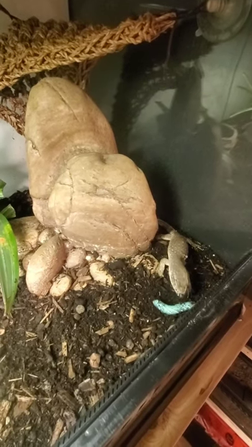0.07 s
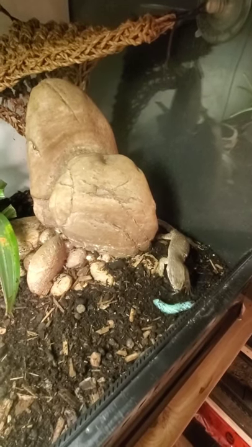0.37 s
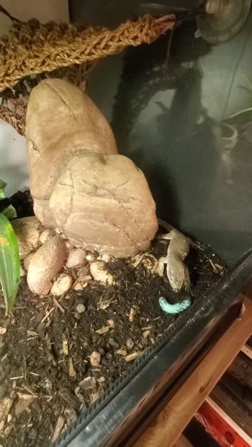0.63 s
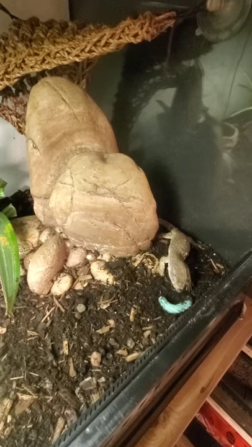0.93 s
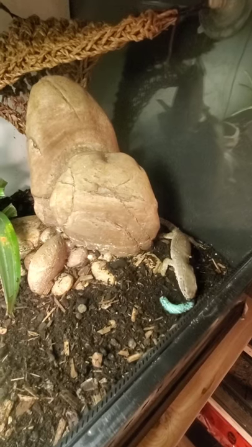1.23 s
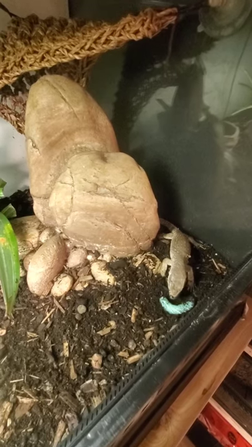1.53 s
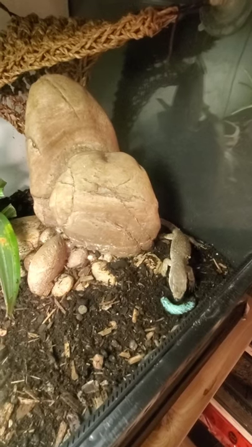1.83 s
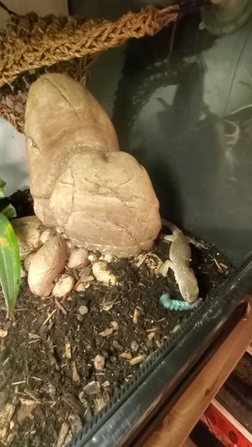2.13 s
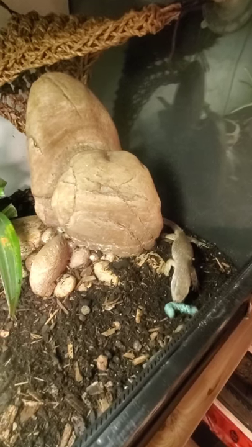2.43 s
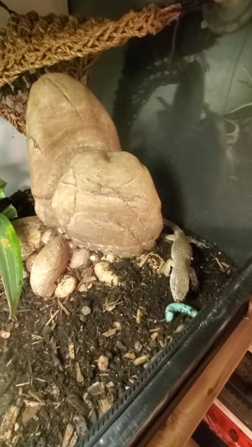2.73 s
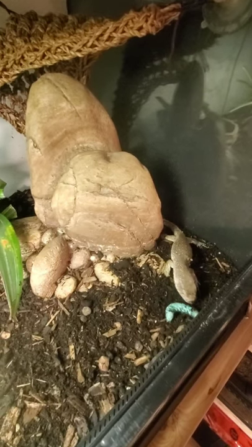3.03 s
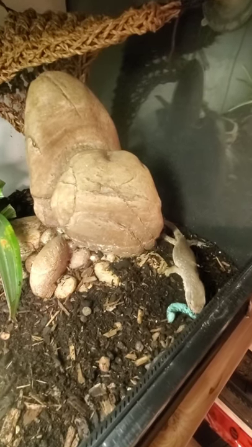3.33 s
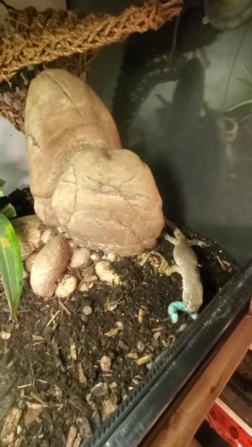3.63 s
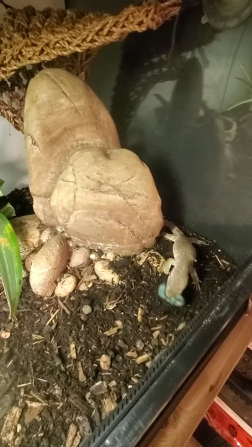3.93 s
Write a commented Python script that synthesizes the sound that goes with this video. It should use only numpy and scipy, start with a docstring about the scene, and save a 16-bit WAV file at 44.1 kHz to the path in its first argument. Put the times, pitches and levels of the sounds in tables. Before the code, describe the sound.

A low ventilation hum runs steadily in a quiet room, with a terrarium lamp hissing faintly on the left. Small ticks come from the right, a dull scuff follows midway, then a few soft handling bumps near the microphone.

```python
"""A quiet room with a lit terrarium. Ventilation noise excites the room's resonances, with a wavering
drone and a deep rumble. The mains hum at even harmonics, and a lamp on the left sizzles and whines,
its amplitude modulated at the mains frequency. Over this come a few soft handling bumps, one dull
scuff just after two faint rings, and on the right some small ticks and one faint falling squeak."""
import sys
import numpy as np
from scipy import signal
from scipy.fft import rfft, irfft
from scipy.io import wavfile
from scipy.ndimage import uniform_filter1d

SR = 44100
rng = np.random.default_rng(int(sys.argv[2]) if len(sys.argv) > 2 else 0)


def master(y):
    """Save y as 16-bit WAV."""
    cut = np.clip(np.atleast_2d(y).T, -1, 1)
    pcm = np.round(cut * 32767)  # scale
    wavfile.write(sys.argv[1], SR, pcm.astype(np.int16))


N = 176400
TIME, HZ = np.arange(N) / SR, np.maximum(np.arange(N // 2 + 1) * SR / N, 1)
MAINS_HZ = 59.985
BASS_PAN_DB = 1.3  # every pan is the left level minus the right

# Ventilation noise. Each row: frequency in Hz, relative spectral density in dB.
AIR_SPECTRUM = [(40, -4.5), (90, 3), (125, 4.5), (160, -2.5), (220, -7), (290, -7.5), (380, -5), (470, -12),
                (560, -20), (750, -23.5), (1200, -27), (1450, -24.5), (1900, -29.5), (2300, -27),
                (3000, -33)]
# Room resonances. Each row: frequency in Hz, bandwidth in Hz, level in dB, pan in dB.
ROOM_MODES = [(68.2, 7.7, -58, -1.5), (100, 6.5, -64, 0.5), (109.9, 12, -61.5, 1), (603, 13, -90, -2),
              (885, 6.8, -102, -2), (1068, 24, -95.5, 13)]
# Envelope of the drone. Each row: time in seconds, level in dB.
DRONE_LEVEL = [(0, -66), (.45, -71.5), (.7, -61), (1.1, -75), (1.5, -63), (2.0, -69.5), (2.5, -71),
               (3.0, -70.5), (4, -68)]
# Envelope of the rumble. Each row: time in seconds, relative level in dB.
RUMBLE_LEVEL = [(0.0, -69), (0.03, -42), (0.11, -48.5), (0.14, -59), (0.19, -45), (0.36, -45),
                (0.49, -56.5), (0.71, -42.5), (0.91, -50), (0.97, -41), (1.0, -59), (1.16, -38),
                (1.27, -69.5), (1.34, -45), (1.68, -46.5), (1.71, -52), (1.83, -41.5), (2.03, -56.5),
                (2.09, -41.5), (2.16, -70), (2.25, -37), (2.52, -44), (2.57, -38.5), (2.68, -75),
                (2.74, -38.5), (2.8, -40.5), (2.84, -51), (3.07, -41), (3.11, -53.5), (3.2, -44),
                (3.5, -52.5), (3.83, -47.5), (3.85, -44), (4.0, -47)]
# Mains hum. Each row: harmonic number, level in dB, pan in dB.
HUM_HARMONICS = [(2, -55.5, 2.5), (4, -75, -10)]
# Lamp sizzle. Each row: frequency in Hz, relative spectral density in dB.
SIZZLE_SPECTRUM = [(2000, -32.5), (3200, -7), (5000, -10.5), (5800, -6.5), (6700, -9.5), (7150, -23),
                   (7600, -27), (8200, -10.5), (9300, -3.5), (11500, 1.5), (14000, 7), (15600, -2.5)]
# Direction of the sizzle. Each row: frequency in Hz, pan in dB.
SIZZLE_PAN = [(3000, 4.5), (6000, 18), (8500, 21.5), (11000, 14.5), (15000, 14)]
# Slow drift of the lamp's level. Each row: time in seconds, gain in dB.
LAMP_DRIFT = [(0, 0.5), (2.2, 0.5), (2.33, 4), (2.7, 1.4), (4, 2.3)]
# Lamp whines. Each row: frequency in Hz, bandwidth in Hz, base level in dB, modulation depth
# from 0 to 1, growth in dB per second.
LAMP_WHINES = [(3854, 380, -91, .1, -1), (6195, 51, -97, .6, 2), (8470, 210, -93.5, 0.13, 1.5),
               (10176, 470, -83, 0.9, 0), (11240, 140, -89.5, 0.1, 0.5), (11880, 180, -82.5, 0.1, 0),
               (12730, 100, -85, 0, -0.5), (13500, 180, -84.5, .3, 1.5), (14580, 100, -82, 0.9, 0.4),
               (16400, 130, -81, 0.5, -2)]
# Handling bumps. Each row: peak time in seconds, boom and body levels in dB, attack and decay in seconds.
BUMPS = [(3.034, -53, -56, 0.0099, 0.063), (3.077, -46, -70, 0.026, .025), (3.28, -47.5, -67, 0.06, 0.057),
         (3.343, -39.5, -58, 0.019, 0.028), (3.679, -43, -68, 0.029, 0.056)]
# Dull body of a bump. Each row: frequency in Hz, relative spectral density in dB.
BUMP_SPECTRUM = [(60, -9.5), (150, -4.5), (320, 1.5), (480, -10), (700, -25), (1100, -24.5), (3000, -46)]
# Friction noise. Each row: frequency in Hz, relative spectral density in dB.
SCUFF_SPECTRUM = [(100, -6), (200, -4), (350, 2.5), (600, -8), (900, -5), (1300, -19.5), (2300, -19),
                  (3500, -28.5), (5600, -21.5), (7200, -52), (12000, -55)]
# Hollow resonances of the scuff. Each row: frequency in Hz, bandwidth in Hz, level in dB.
SCUFF_MODES = [(348, 61, -60), (600, 110, -64.5), (834, 59, -71)]
# Small contacts. Each row: start in seconds, peak level before panning in dB, pan in dB.
TICKS = [(1.386, -62.5, -15), (2.064, -55, -24), (2.465, -58.5, -15), (3.527, -55, -21),
         (3.956, -54.5, -19)]
# Glide of the squeak. Each row: time in seconds, pitch in Hz, level in dB.
SQUEAK_GLIDE = [(1.55, 1830, -92), (1.585, 1853, -71), (1.625, 1807, -73.5), (1.67, 1702, -69),
                (1.705, 1610, -86), (1.75, 1640, -100)]
# Brief rings. Each row: peak time in seconds, frequency in Hz, level in dB.
RINGS = [(2.165, 2860, -79), (2.187, 960, -70.5)]
# Coherence of the room's sound field. Each row: frequency in Hz, left-right correlation from 0 to 1.
COHERENCE = [(50, 1), (130, 0.61), (330, 0.91), (600, 0.24), (1200, 0), (5000, 0)]


def ventilation():
    """Forced resonance: broadband air noise drives the room modes, over a drone and a throbbing rumble."""
    octaves_above_table = np.log2(np.maximum(HZ / AIR_SPECTRUM[-1][0], 1))
    spectrum_db = by_hz(AIR_SPECTRUM) - 9.5 * octaves_above_table
    air = from_db(-61.5) * room_noise(from_db(spectrum_db))
    modes = sum(from_db(db) * pan(pan_db) * room_noise(resonance(hz, width))
                for hz, width, db, pan_db in ROOM_MODES)
    drone = from_db(in_time(DRONE_LEVEL)[0]) * narrowband(hz=335.7, width_hz=18, evenness=0.48)
    rumble = from_db(in_time(RUMBLE_LEVEL)[0] + 1) * narrowband(hz=54.3, width_hz=10.6, evenness=0.92)
    return air + modes + pan(db=-4.5) * drone + pan(BASS_PAN_DB) * rumble


def mains_hum():
    """Harmonic vibration: steady sinusoids at even multiples of the mains frequency."""
    hum = 0
    for harmonic, db, pan_db in HUM_HARMONICS:
        phase = 2 * np.pi * (harmonic * MAINS_HZ * TIME + rng.random())
        hum += from_db(db) * pan(pan_db) * np.sqrt(2) * np.sin(phase)
    return hum


def lamp_sizzle(repeating_share=0.12, flare_db=2.3):
    """Cyclostationary noise: the same flares, and a share of the waveform, recur every mains cycle."""
    period = round(SR / MAINS_HZ)
    cycle_index = (TIME * MAINS_HZ % 1 * period).astype(int)
    flare = unit_rms(uniform_filter1d(rng.standard_normal(period), size=30, mode="wrap"))[cycle_index]
    repeating = np.sqrt(repeating_share) * rng.standard_normal(period)[cycle_index]
    fresh = np.sqrt(1 - repeating_share) * rng.standard_normal((2, N))
    sparks = (repeating + fresh) * from_db(flare_db * flare)
    sizzle = irfft(rfft(sparks) * from_db(by_hz(SIZZLE_SPECTRUM)) * pan(by_hz(SIZZLE_PAN)), N)
    return from_db(-70 + in_time(LAMP_DRIFT)[0]) * unit_rms(sizzle)


def lamp_whines():
    """Amplitude modulation: neighbouring thin whines swell on opposite halves of the mains cycle."""
    mains = np.sin(2 * np.pi * MAINS_HZ * TIME)
    whines = 0
    for k, (hz, width, db, depth, growth) in enumerate(LAMP_WHINES):
        swell = unit_rms(1 + (-1) ** k * depth * mains)
        whines += from_db(db + growth * TIME) * swell * narrowband(hz, width, evenness=0.24)
    return from_db(0.96 * in_time(LAMP_DRIFT)[0]) * pan(db=21.5) * whines


def handling_bumps():
    """Soft impact: a slow contact puts its energy at low frequencies, as a boom with a dull body."""
    boom = narrowband(hz=104.7, width_hz=22.3, evenness=0.82)
    body = room_noise(from_db(by_hz(BUMP_SPECTRUM)))
    bumps = sum(envelope(peak_s, attack, decay) * (from_db(boom_db) * boom + from_db(body_db) * body)
                for peak_s, boom_db, body_db, attack, decay in BUMPS)
    return pan(BASS_PAN_DB) * bumps


def scuff():
    """Sliding friction: one short rub makes dull noise and excites hollow resonances."""
    rub = from_db(-56.5) * room_noise(from_db(by_hz(SCUFF_SPECTRUM)))
    hollow = sum(from_db(db) * narrowband(hz, width, evenness=0.6) for hz, width, db in SCUFF_MODES)
    return envelope(peak_s=2.247, attack_s=0.011, decay_s=0.045, hold_s=0.027) * (rub + hollow)


def ticks(low_hz=488, high_hz=2380, reverb_db=3):
    """Impulse excitation: each tiny contact is a band-limited click with a more diffuse room tail."""
    band = np.vstack([signal.butter(2, low_hz, "high", fs=SR, output="sos"),
                      signal.butter(6, high_hz, fs=SR, output="sos")])
    out = 0
    for start_s, db, pan_db in TICKS:
        tick = signal.sosfilt(band, signal.unit_impulse(N, int(start_s * SR)) + 1e-18)
        tick = from_db(db) * tick / np.abs(tick).max()
        out += pan(pan_db) * tick + from_db(reverb_db) * pan(0.4 * pan_db) * reverberation(tick)
    return out


def squeak():
    """Frequency modulation: a thin tone wavers at random as it falls, smeared by reverberation."""
    hz, db = in_time(SQUEAK_GLIDE)
    waver = 1 + 0.012 * unit_rms(uniform_filter1d(rng.standard_normal(N), size=200))
    phase = 2 * np.pi * np.cumsum(hz * waver) / SR
    sounding = (TIME > SQUEAK_GLIDE[0][0]) & (TIME < SQUEAK_GLIDE[-1][0])
    tone = np.sqrt(2) * from_db(db) * np.sin(phase) * sounding
    return pan(db=-18) * tone + from_db(-0.5) * reverberation(tone)


def rings():
    """Damped resonance: two faint bands of noise, narrow enough to have pitch, die away quickly."""
    out = 0
    for peak_s, hz, db in RINGS:
        ring = room_noise(resonance(hz, width_hz=0.089 * hz))
        out += from_db(db) * envelope(peak_s, attack_s=0.018, decay_s=0.041) * ring
    return out


def reverberation(x, decay_s=0.045, delay_s=0.008):
    """Diffuse reflection: convolution with a delayed, exponentially decaying stereo noise."""
    t = TIME[:SR // 2]
    tail = rng.standard_normal((2, len(t))) * np.exp(-t / decay_s) * (t > delay_s)
    return signal.fftconvolve(x[None], tail / np.sqrt(np.sum(tail[0] ** 2)), axes=1)[:, :N]


def room_noise(gain):
    """Spatial coherence: coloured noise whose long waves alone are alike on both sides."""
    mid, side = rfft(rng.standard_normal((2, N)))
    coherence = by_hz(COHERENCE)
    spectrum = np.sqrt(1 + coherence) * mid + np.sqrt(1 - coherence) * side * [[1], [-1]]
    return unit_rms(irfft(gain * spectrum, N))


def narrowband(hz, width_hz, evenness):
    """Beating: a narrow band of noise is a throbbing tone; evenness, 0 to 1, compresses its swells."""
    analytic = signal.hilbert(irfft(rfft(rng.standard_normal(N)) * resonance(hz, width_hz), N))
    amplitude = unit_rms(np.abs(analytic))
    return unit_rms(analytic.real / (amplitude ** 2 + 0.1) ** (evenness / 2))


def resonance(hz, width_hz):
    """Frequency response of a steep-sided resonance."""
    return 1 / (1 + ((HZ ** 2 - hz ** 2) / (HZ * width_hz * 1.39)) ** 2)


def envelope(peak_s, attack_s, decay_s, hold_s=0):
    """Gaussian rise, hold and exponential decay."""
    age = TIME - peak_s
    return np.exp(-(np.minimum(age, 0) / attack_s) ** 2 - np.maximum(age - hold_s, 0) / decay_s)


def pan(db):
    """Level difference: left and right gains with a mean of one."""
    gains = from_db(np.array([[0.5], [-0.5]]) * db)
    return gains / gains.mean(axis=0)


def in_time(rows):
    """Linear interpolation of each value column at every sample."""
    seconds, *columns = np.transpose(rows)
    return [np.interp(TIME, seconds, column) for column in columns]


def by_hz(rows):
    """Interpolation on a logarithmic frequency axis."""
    hz, value = np.transpose(rows)
    return np.interp(np.log(HZ), np.log(hz), value)


def from_db(db):
    """Decibels to amplitude ratio."""
    return 10 ** (np.asarray(db) / 20)


def unit_rms(x):
    """Normalisation to unit power."""
    return x / np.sqrt(np.mean(x ** 2) + 1e-30)


def scene():
    """Superposition: the steady sources and the small events add."""
    steady = ventilation() + mains_hum() + lamp_sizzle() + lamp_whines()
    return steady + handling_bumps() + scuff() + ticks() + squeak() + rings()


def record(dry, low_hz=40, high_hz=15700):
    """Band limiting: steep filters remove the deepest bass and the highest treble."""
    thinned = irfft(rfft(dry) / np.sqrt(1 + (low_hz / HZ) ** 16), N)
    return signal.sosfilt(signal.ellip(12, 0.1, 80, high_hz, fs=SR, output="sos"), thinned)


dry = scene()
out = record(dry)
master(out)
```